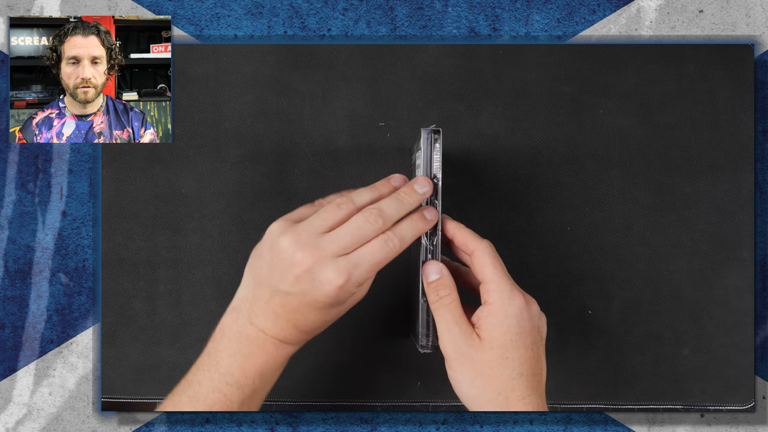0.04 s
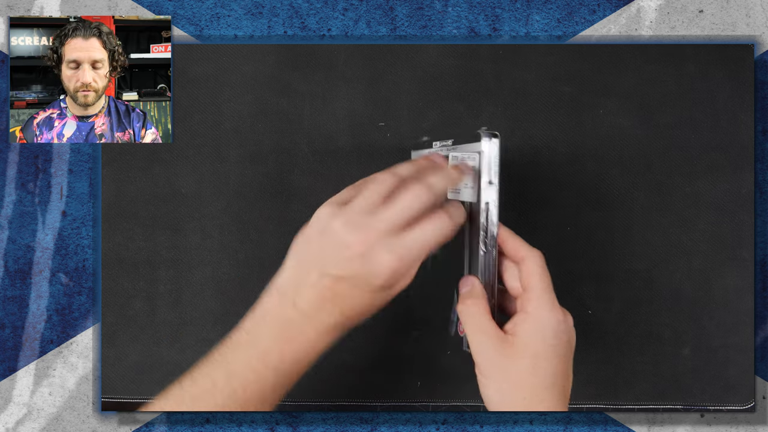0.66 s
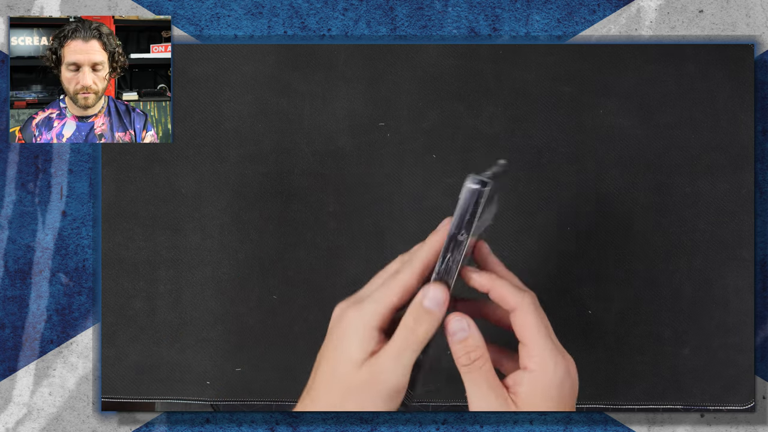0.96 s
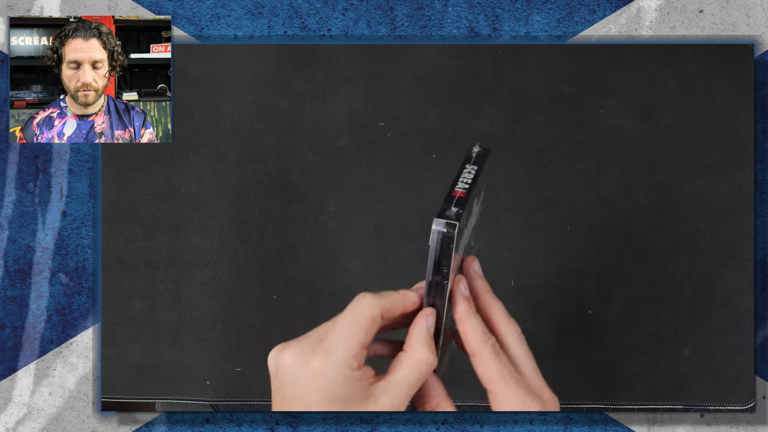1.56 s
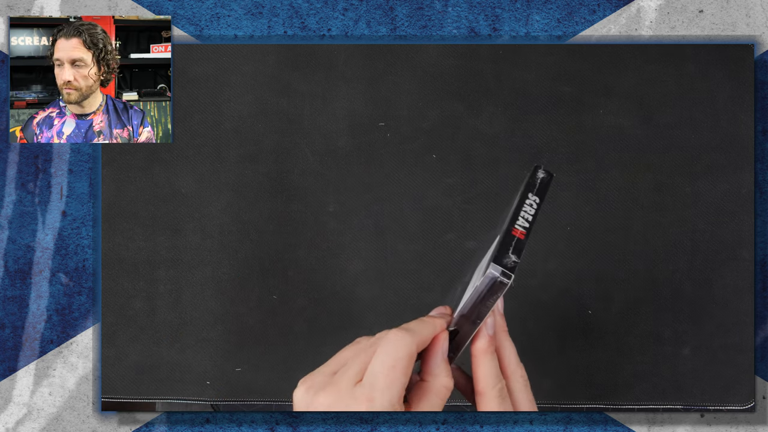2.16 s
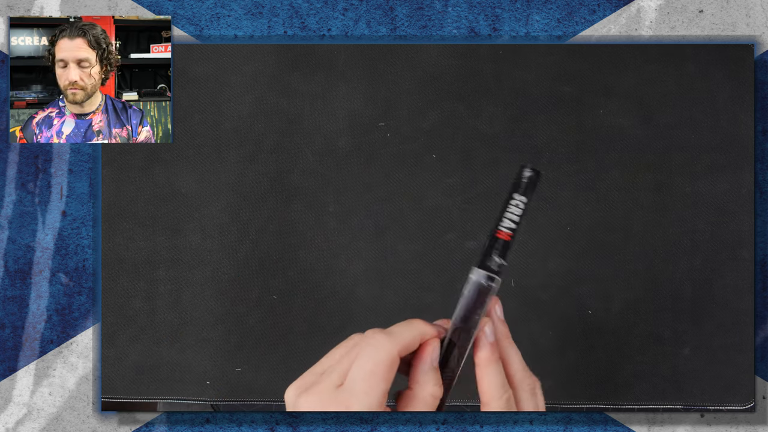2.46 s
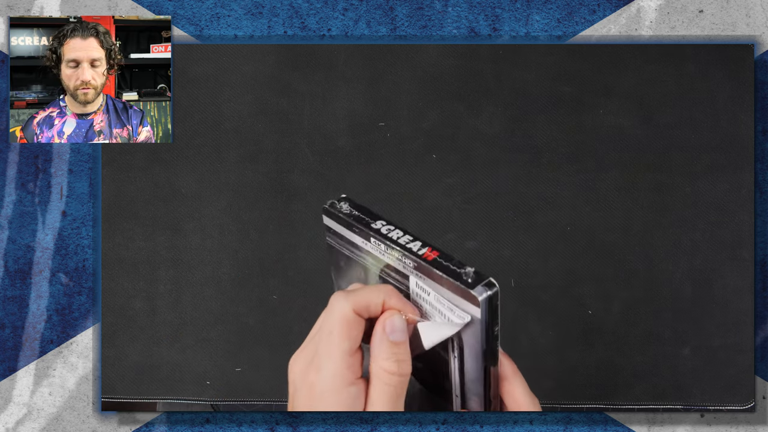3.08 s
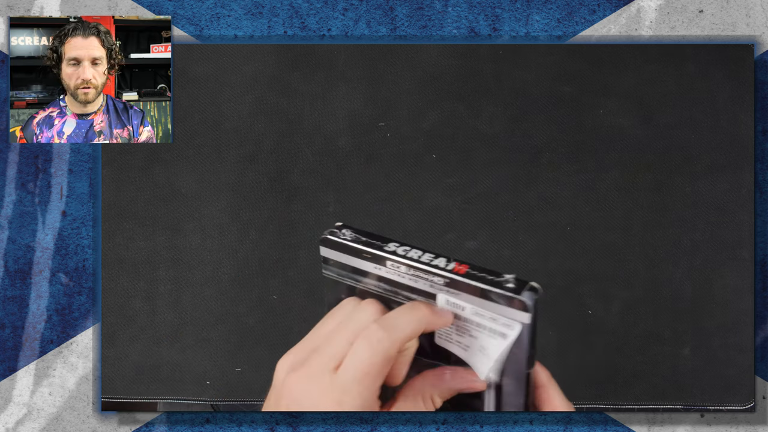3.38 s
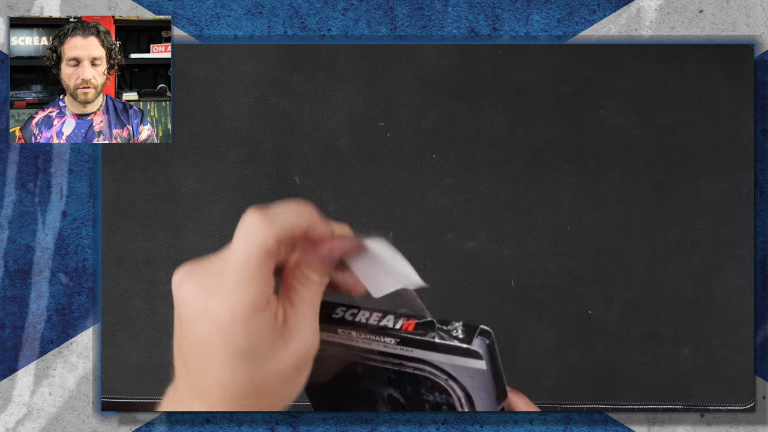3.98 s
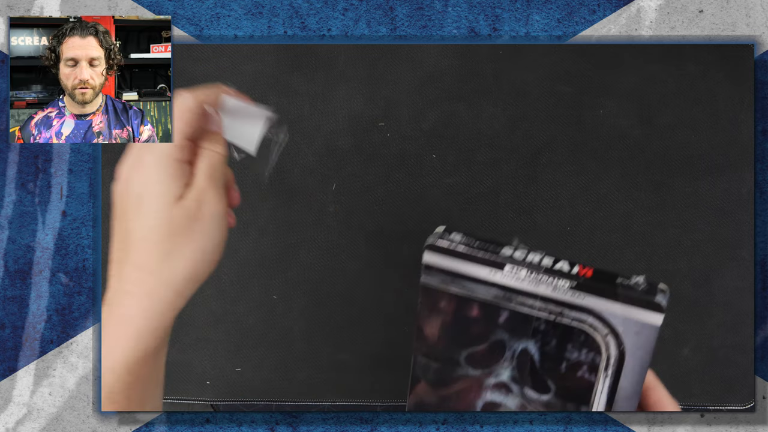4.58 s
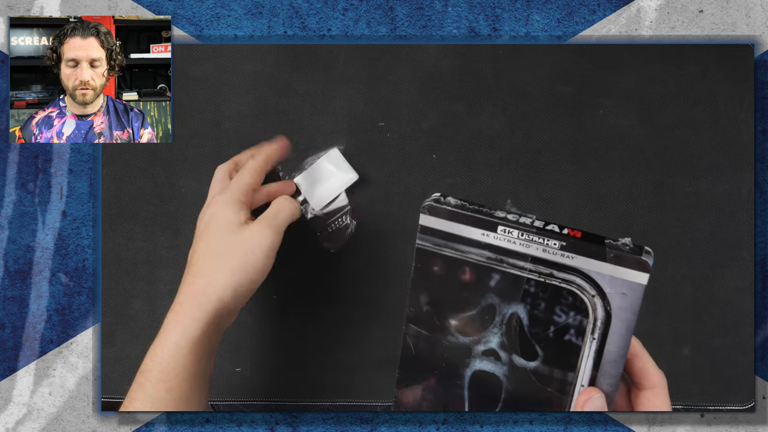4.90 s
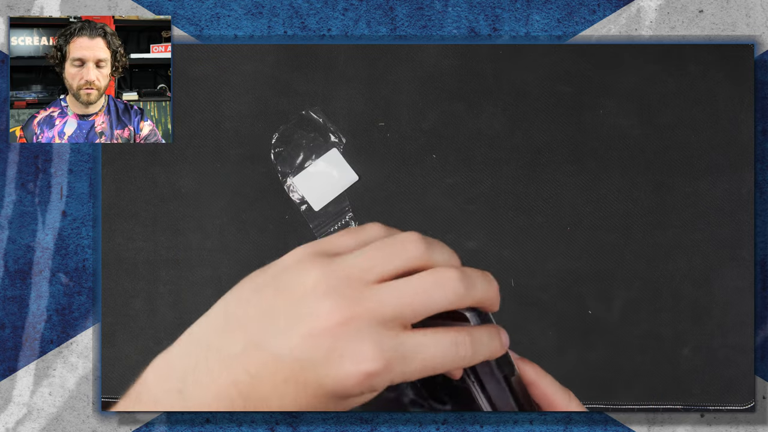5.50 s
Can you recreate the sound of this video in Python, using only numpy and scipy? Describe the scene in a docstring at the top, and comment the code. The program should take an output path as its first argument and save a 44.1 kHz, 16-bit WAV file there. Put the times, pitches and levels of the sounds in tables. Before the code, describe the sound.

Close up, in a small damped room, fingers pick at the shrink wrap on a hard plastic disc case. A quick hissy scrape and a few dry ticks fill the first 0.7 seconds. From about 0.8 to 1.5 seconds, fingers rub and bump the hollow case with tiny creaks and a clearer knock near 1.25 seconds. Quiet, grainy sliding and sparse ticks follow. Around 2.5 seconds the film starts tearing, with a sharp crackling burst at 2.7 and single snaps until 3.3. Another loud cluster comes at 3.7 to 3.9 seconds. At 4.4 the strip pulls free with a snap and a low thump. The loose film crinkles more softly as it is dropped on the table by 5 seconds, and a few light knocks on the case come near 5.5. A faint low hum and flickering hiss lie underneath.

```python
"""A grainy hiss of sliding film, then dry snaps: hands pick at the shrink wrap on a hard disc case,
tear a strip off and drop it on the table. The film hisses as it sticks and slips over itself and
snaps as its taut creases buckle, while fingers rub and bump the hollow, ringing case.
A small damped room answers briefly, over a low hum and a faint flickering hiss."""
import sys
import numpy as np
from scipy import signal
from scipy.fft import rfft, irfft
from scipy.io import wavfile
from scipy.ndimage import uniform_filter1d

SR = 44100
rng = np.random.default_rng(int(sys.argv[2]) if len(sys.argv) > 2 else 0)


def pcm_store(signal):
    """Save signal as 16-bit PCM."""
    levels = np.round(np.clip(np.atleast_2d(signal), -1, 1) * 32767)
    wavfile.write(sys.argv[1], SR, levels.astype(np.int16).T)


N = 249165

# Ride on the background, which sinks while the film tears. Each row: time in seconds, gain in dB.
BACKGROUND_RIDE = [(0, 3), (.3, 1), (.36, -5), (.43, 3), (.66, 2), (.71, -7), (.79, -5), (.85, 2.5),
                   (1.7, 2.5), (2.2, -1.5), (2.66, 0.5), (2.73, -16), (3.3, -18.5), (3.7, -2), (3.83, -15),
                   (4.12, -17), (4.3, -5.5), (4.5, -15), (4.8, -3.5), (5.0, 2.5), (5.35, -10), (5.48, 4),
                   (5.65, -9.5)]
# Tone of the room's rumble and of the thin hiss. Each row: frequency in Hz, relative level in dB.
RUMBLE_EQ = [(20, -23), (45, -18), (70, -6), (92, 0), (120, -2), (160, -6), (250, -13), (600, -14),
             (1200, -24), (2500, -24), (6000, -34), (16000, -32)]
THIN_HISS_EQ = [(1200, -30), (1900, -17), (2400, -7), (3100, -9), (3700, -1), (4150, 0), (4600, -9),
                (5300, -11), (6500, -22), (9000, -35)]
# Scratchy flares of the thin hiss.
# Each row: middle in seconds, length in seconds, relative level in dB, centre in Hz.
FLARES = [(0.023, 0.051, -52, 4100), (0.225, 0.043, -61, 4000), (0.298, 0.033, -52.5, 3680),
          (0.489, 0.024, -49.5, 3980), (0.625, 0.031, -53.5, 4150), (1.581, 0.033, -51.5, 4140),
          (1.623, 0.057, -52, 3950), (1.737, 0.031, -50.5, 4070), (1.93, 0.017, -55.5, 4160),
          (2.036, 0.055, -58, 4000), (2.363, 0.028, -56.5, 4300), (5.028, 0.043, -57, 4120),
          (5.277, 0.034, -60.5, 4030), (5.495, 0.04, -60, 4070)]
# Strokes that slide the film. Each row: fastest moment, swell and fade in seconds,
# then the relative levels of film on film and of film on case in dB.
SLIDES = [(.03, 0.092, 0.16, -52, -55), (.168, 0.05, 0.03, -37, -52), (.31, 0.15, 0.14, -61, -62.5),
          (.43, 0.05, 0.073, -52.5, -54.5), (.58, 0.034, 0.23, -54.5, -54), (.86, 0.055, 0.075, -56, -55),
          (.905, 0.046, 0.059, -51, -55), (.935, .015, 0.068, -52, -54.5), (.985, 0.028, 0.039, -45, -45),
          (1.03, 0.027, 0.29, -55.5, -56.5), (1.105, 0.077, 0.046, -55, -55.5),
          (1.28, 0.086, 0.16, -52, -55), (1.36, 0.14, 0.35, -52.5, -63), (1.61, 0.33, 0.15, -66, -62),
          (1.72, 0.11, 0.35, -58, -59), (2.04, 0.21, 0.31, -63.5, -62), (2.29, 0.041, 0.15, -57.5, -57),
          (2.47, 0.11, 0.13, -54.5, -63), (2.56, 0.042, 0.083, -51.5, -51),
          (2.685, 0.083, 0.056, -41.5, -54), (3.17, 0.039, 0.062, -48.5, -62),
          (3.065, 0.15, 0.0083, -62, -92), (3.39, 0.34, 0.27, -59.5, -62), (3.67, 0.17, 0.26, -52.5, -55.5),
          (3.905, 0.013, 0.063, -42.5, -48.5), (4.216, 0.013, 0.056, -52, -51.5),
          (4.379, 0.038, 0.012, -39.5, -43.5), (4.585, 0.077, 0.089, -48.5, -52.5),
          (4.73, 0.074, 0.046, -46, -56.5), (4.85, 0.057, 0.025, -52, -80),
          (4.905, 0.017, 0.022, -48.5, -51), (4.965, 0.13, 0.17, -50.5, -51), (5.47, 0.15, 0.13, -61, -59)]
# Tone of film on film and of film on case. Each row: frequency in Hz, relative level in dB.
FILM_HISS_EQ = [(600, -50), (2000, 0.5), (3500, 1), (5500, -3), (8500, 1.5), (11000, -1.5), (16000, -8.5)]
FILM_SCRAPE_EQ = [(300, -26.5), (750, 6.5), (1100, -1), (1600, 2.5), (2400, 8.5), (3500, 6.5), (6000, -10),
                  (12000, -61.5)]
# Quick swishes of film. Each row: start in seconds, length in seconds, level in dB, centre in Hz.
SWISHES = [(0.133, 0.03, -43, 9900), (1.342, 0.04, -50, 8400), (1.817, 0.064, -52, 8440),
           (2.424, 0.11, -42.5, 8300), (2.545, 0.014, -45, 9050), (3.374, 0.066, -59, 8100),
           (4.343, 0.04, -48.5, 1560), (4.381, 0.016, -33, 8000), (4.536, 0.06, -52, 3900),
           (4.933, 0.02, -60, 4430)]
# The featured snaps of the film. Each row: start in seconds, energy in dB rms over 1 ms,
# flutter time in seconds, pitch below which the snap thins out in Hz, pitch of one added ring in Hz,
# top octave gain in dB, case ring gain in dB, case ring centre in Hz.
SNAPS = [(0.143, -38, 0.003, 5000, 10800, -16, -19, 2900), (0.148, -43, 0.002, 8000, 10400, -1, -19, 4500),
         (0.161, -36, 0.0031, 3600, 7700, -14, -16, 700), (0.167, -45, 0.0015, 6000, 9500, -4, -10, 700),
         (0.178, -30.5, 0.00089, 6000, 14500, -16, -4.5, 2600),
         (0.209, -44, 0.0017, 6700, 14500, -14, -8, 700), (0.5552, -34.5, 0.0044, 5600, 3500, -9, -17, 700),
         (0.5752, -37, 0.00074, 2940, 10800, -4, 12.5, 800), (0.651, -46, 0.0013, 3000, 9300, 0, 6, 700),
         (0.6775, -25, 0.0013, 7300, 3470, 1, -9, 700), (0.9276, -39.5, 0.0016, 3000, 8900, -8, 13, 700),
         (0.98, -37.5, 0.011, 3000, 7000, -13, 15, 1200), (1.339, -38.5, 0.0061, 4600, 6400, -6, 5.5, 1700),
         (1.411, -44.5, 0.0034, 3600, 8900, -3, 19, 1690), (1.425, -43, 0.00091, 7500, 8900, -4, 1, 700),
         (1.5335, -37, 0.0012, 6000, 11800, -8, -2, 700), (1.6837, -40.5, 0.0014, 8760, 12500, -7, 2, 705),
         (1.847, -43.5, 0.0016, 7500, 11900, -5, -8, 700), (2.004, -39.5, 0.0014, 10000, 3500, 7, -4, 700),
         (2.259, -43, 0.0026, 6730, 7100, -4, -11, 695), (2.4498, -44.5, 0.0014, 8400, 9300, -5, 7.5, 700),
         (2.459, -37, 0.0028, 4970, 4700, -12, -5, 700), (2.466, -37, 0.0018, 8000, 8500, -8, -24, 700),
         (2.502, -30, 0.0027, 5550, 7700, -6, -19, 700), (2.556, -30.5, 0.0019, 5000, 5400, -5, -14, 700),
         (2.5601, -33.5, 0.0018, 4000, 5400, 2, 9.5, 2490), (2.616, -46.5, 0.002, 4200, 11300, -5, -5, 700),
         (2.6409, -33.5, 0.014, 5600, 5560, 1.5, 13, 900), (2.66, -28.5, 0.00088, 6300, 5700, 5.5, 13, 900),
         (2.6718, -17.5, 0.0017, 4650, 6580, -5, -4, 1900), (2.6785, -21.5, 0.0017, 3580, 9000, 4, -6, 700),
         (2.6882, -24, 0.0032, 6000, 13100, 0, -0.5, 1700),
         (2.696, -24.5, 0.0066, 6000, 9300, 1, -9.5, 1900),
         (2.765, -43.5, 0.0037, 8360, 10000, -5, 3.5, 1900),
         (2.835, -29, 0.0017, 4800, 5600, -1.5, 6.5, 2350), (2.905, -52.5, 0.0015, 5000, 6000, -17, 5, 900),
         (2.9211, -40, 0.0068, 4500, 8100, -6, 8, 2200), (2.949, -45, 0.0014, 4500, 13800, -10, -4, 2900),
         (2.9616, -20.5, 0.00094, 8300, 13800, -3.5, -14, 1090),
         (3.064, -57, 0.0039, 3600, 5700, -8, 7, 700), (3.082, -36, 0.0045, 8650, 13000, -7.5, -9.5, 700),
         (3.1438, -40, 0.0021, 4730, 8600, -9, -5, 700), (3.157, -44, 0.0019, 5600, 9300, -13, -1, 1100),
         (3.1945, -19, 0.0011, 6130, 8700, 0.5, -3, 2450), (3.2708, -23, 0.0013, 7500, 8700, -5, -6, 2970),
         (3.607, -41, 0.0019, 3000, 13800, -8, 4, 3400), (3.6285, -46, 0.0015, 3000, 9800, 2, -1, 700),
         (3.6378, -40.5, 0.004, 5000, 11300, -3, 14, 905), (3.6413, -41, 0.0012, 4200, 7000, -12, 7, 800),
         (3.6532, -37.5, 0.0035, 4000, 14500, -13, -5, 1900),
         (3.6688, -30.5, 0.00097, 2950, 10300, 4, -8, 700), (3.6776, -45, 0.0018, 5600, 13800, -3, 12, 700),
         (3.684, -36, 0.0019, 4000, 14000, 4, 7, 1100), (3.69, -36, 0.0015, 3000, 14500, 4, 0, 700),
         (3.696, -44.5, 0.0016, 8400, 4700, 0, 13, 700), (3.703, -36, 0.00089, 10000, 3500, -3, -2, 700),
         (3.711, -40, 0.0011, 6000, 7700, -3, 3, 700), (3.7929, -15, 0.0012, 5670, 3900, 4, -7, 700),
         (3.7974, -26, 0.0024, 5000, 3500, 2, -17, 700), (3.8158, -36, 0.0029, 3600, 14500, -22, 3.5, 795),
         (3.8845, -21, 0.0031, 6300, 6300, 1.5, -11, 883),
         (3.895, -22.5, 0.0095, 5400, 14700, -0.5, -9.5, 900),
         (3.9067, -30, 0.0018, 5600, 3500, 6, -6, 705), (3.909, -40, 0.0021, 4740, 5400, -1, 4, 800),
         (3.9201, -26, 0.0088, 6800, 6250, 1, -14, 700), (4.012, -46, 0.0088, 3000, 4550, -20, 19, 1360),
         (4.0438, -46, 0.0024, 8070, 4700, -1.5, -3, 900), (4.1797, -40.5, 0.0022, 6300, 7040, 1, -1, 2900),
         (4.1984, -42.5, 0.0031, 3400, 7300, 4, -4, 2200), (4.211, -33, 0.0039, 2950, 7000, -6, 9, 686),
         (4.221, -32.5, 0.0021, 5100, 8250, -8, -3, 700), (4.2776, -44.5, 0.0042, 6300, 3500, -3, -4, 1100),
         (4.317, -40, 0.0019, 4000, 13100, -6, 14, 705), (4.3428, -43.5, 0.0009, 3800, 4500, -19, 15, 1400),
         (4.376, -33, 0.003, 4450, 5970, -10, 12, 1390),
         (4.3902, -19.5, 0.00094, 5250, 7100, -5, 6.5, 1330),
         (4.422, -43.5, 0.0015, 4000, 14500, -7, 3, 800), (4.539, -45, 0.0018, 3200, 4100, -9, -3, 800),
         (4.5985, -35, 0.0011, 5000, 7300, -15, -5, 3340), (4.635, -36, 0.0082, 3200, 3500, -8, 7, 4500),
         (4.6413, -35.0, 0.0032, 4700, 14500, -15, 6, 3400),
         (4.675, -46.5, 0.0011, 4500, 8100, -11, -3, 700),
         (4.729, -28, 0.0047, 4440, 14500, -12, 1.5, 2470), (4.757, -50, 0.0008, 3000, 11900, -4, -1, 700),
         (4.773, -49, 0.001, 3200, 11300, -11, -7, 700), (4.7861, -35.5, 0.0007, 3000, 5200, -9, -5, 700),
         (4.8937, -36.5, 0.006, 5300, 14500, -11, -2, 700),
         (4.9045, -40.5, 0.0015, 5000, 5400, -11, 5, 800), (4.9306, -29.5, 0.0027, 3000, 4630, -30, 4, 800),
         (4.97, -42, 0.004, 4200, 7000, 2, -3, 900)]
# Resonances of the case. Each row: frequency in Hz, width in Hz, relative level in dB.
CASE_MODES = [(240, 140, -9), (326.5, 52, 3.5), (420, 48, 3), (494, 47, 4), (654, 85, -2.5),
              (1084, 104, -7.5), (1600, 150, -13.5), (1780, 300, -9), (2930, 290, -16.5), (3110, 450, -15)]
# How strongly a snap drives the case. Each row: frequency in Hz, gain in dB.
SNAP_INTO_CASE = [(100, -20), (450, -9), (750, -1), (1500, 9.5), (2700, 12), (4000, 8.5), (8000, 23)]
# Fingers dragging over the case.
# Each row: fastest moment, swell and fade in seconds, relative level in dB.
DRAGS = [(.17, 0.14, .04, -64), (.58, 0.047, 0.3, -66.5), (.85, 0.025, 0.14, -49.5),
         (.99, 0.081, 0.15, -49), (1.185, 0.066, 0.11, -53.5), (1.265, 0.067, 0.11, -49.5),
         (1.36, 0.088, 0.23, -54), (1.8, 0.64, 0.34, -62.5), (2.58, 0.2, 0.11, -55.5),
         (3.17, 0.05, 0.05, -66.5), (3.69, 0.21, 0.14, -58), (3.91, 0.023, 0.049, -58.5),
         (4.365, 0.052, 0.045, -49.5), (4.98, 0.16, 0.063, -59), (5.485, 0.045, 0.06, -59)]
# Bumps on the case. Each row: start in seconds, knock peak in dB, knock centre in Hz, thump peak in dB.
BUMPS = [(0.1793, -44.5, 457, -64), (0.9792, -57, 390, -69), (0.828, -43.5, 410, -69),
         (0.8553, -43.5, 400, -52), (0.872, -52, 430, -62), (0.931, -44, 360, -65), (1.098, -42, 390, -49),
         (1.174, -44, 576, -62), (1.2097, -44, 480, -72), (1.2524, -31.5, 570, -60), (1.264, -46, 640, -86),
         (1.456, -46.5, 574, -68), (1.8083, -46.5, 410, -76), (2.485, -47.5, 510, -73),
         (2.673, -51, 490, -49), (2.923, -59, 483, -75), (2.9626, -58, 436, -81), (3.018, -65.5, 340, -66),
         (3.083, -55, 450, -72), (3.145, -63, 370, -60), (3.273, -57, 390, -64), (3.311, -65, 310, -72),
         (3.414, -62, 293, -57), (3.5114, -50, 398, -59), (3.639, -48, 420, -50), (3.793, -57, 450, -64),
         (4.012, -60, 290, -49.5), (4.2111, -45.5, 425, -46), (4.3164, -44, 637, -55),
         (4.3901, -43, 340, -52), (4.7296, -46.5, 410, -56), (4.8264, -54.5, 353, -60),
         (5.409, -49, 516, -65), (5.463, -46, 470, -65), (5.49, -47, 700, -75), (5.546, -56, 440, -68)]
# Fingertip creaks. Each row: start in seconds, length in seconds, level in dB, pitch in Hz.
JUDDERS = [(0.92, 0.031, -52, 342), (0.976, 0.022, -46, 317), (0.992, 0.043, -53, 333),
           (1.166, 0.022, -58.5, 614), (1.2, 0.037, -54.5, 311), (3.694, 0.025, -60.5, 564),
           (5.487, 0.023, -56.5, 494)]
# Kicks of the case as the film lets go. Each row: start in seconds, peak in dB, push time in seconds.
RECOILS = [(2.837, -60, 0.00095), (3.1943, -53, 0.00074), (3.7929, -37.5, 0.00046), (4.389, -44, 0.0013),
           (4.3905, -19.5, 0.00015)]
# Decay of the room. Each row: frequency in Hz, time to fall 60 dB in seconds.
ROOM_DECAY = [(150, 0.074), (600, 0.025), (2000, 0.081), (7000, 0.085), (16000, 0.054)]


def amp(db):
    return 10 ** (np.asarray(db) / 20)


def unit_rms(x):
    return x / np.sqrt(np.mean(x ** 2) + 1e-20)


def curve(points, hz):
    """A breakpoint curve, read along a log frequency axis."""
    point_hz, value = np.transpose(points)
    return np.interp(np.log(hz + 1), np.log(point_hz + 1), value)


def add(mix, start_s, sound):
    part = mix[max(round(start_s * SR), 0):][:len(sound)]
    part += sound[:len(part)]


def bins(size=2048):
    return np.fft.rfftfreq(size, 1 / SR)


def octaves_from(centre_hz):
    return abs(np.log2((bins() + 20) / centre_hz))


def impulse(gain_db):
    """The sharpest impulse response that has this spectrum."""
    log_gain = np.log(amp(np.concatenate([gain_db, gain_db[-2:0:-1]])))
    return irfft(np.exp(np.conj(signal.hilbert(log_gain)))[:len(gain_db)])


def colour(x, gain_db):
    """EQ a sound and bring it to unit rms."""
    return unit_rms(signal.oaconvolve(x, impulse(gain_db))[:len(x)])


def drift(noise, span, axis=-1):
    """Noise smoothed into a wobble of unit rms."""
    return unit_rms(uniform_filter1d(noise, size=span, axis=axis))


def case_db(hz, damping=1):
    """Body of the case: the summed power of its resonances."""
    power = 0
    for mode_hz, width_hz, db in CASE_MODES:
        detuning = (hz ** 2 - mode_hz ** 2) / ((hz + 1) * width_hz * damping)
        power += amp(db) ** 2 / (1 + detuning ** 2)
    return 10 * np.log10(power + 1e-10)


def slips(per_s, spread_db, smooth_db):
    """Stick-slip: random tiny clicks of uneven size over smooth friction noise."""
    size = amp(spread_db * np.minimum(rng.exponential(1, N), 4))
    clicks = size * rng.choice([-1, 1], N) * (rng.random(N) < per_s / SR)
    return unit_rms(unit_rms(clicks) + amp(smooth_db) * rng.standard_normal(N))


def strokes(rows, rest_db, column=3, depth_db=21.5, roundness=1.29):
    """Envelope of a rub: each stroke swells and fades above the faint rub of the resting hand."""
    t = np.arange(0, N + 64, 64) / SR
    power = amp(rest_db) ** 2
    for row in rows:
        peak_s, swell_s, fade_s = row[:3]
        away = np.maximum((peak_s - t) / swell_s, (t - peak_s) / fade_s)
        power = power + amp(row[column] - depth_db * away ** roundness) ** 2
    return np.interp(np.arange(N) / SR, t, np.sqrt(power))


def jerks(depth_db=5.0, jerk_s=0.011):
    """A rubbing hand never moves evenly: a gain that catches and lets go many times a second."""
    times = np.arange(1000) * jerk_s
    catches = np.clip(rng.standard_normal(len(times)), -2, 2)
    return unit_rms(amp(depth_db * np.interp(np.arange(N) / SR, times, catches)))


def background(rumble_db=-62, hum_db=-68, hum_hz=119.0, hiss_db=-67):
    """The bed: low room noise, a wavering hum and a thin hiss, all on one level ride."""
    t = np.arange(N) / SR
    rumble = amp(rumble_db) * colour(rng.standard_normal(N), curve(RUMBLE_EQ, bins(size=8192)))
    waver = drift(drift(rng.standard_normal(N), 3000), 3000)
    tone = np.sin(2 * np.pi * hum_hz * t + .5 * waver[::-1])
    hum = amp(hum_db) * unit_rms((1 + 0.33 * waver) * tone)
    ride = amp(np.interp(t, *np.transpose(BACKGROUND_RIDE)))
    return ride * (rumble + hum + amp(hiss_db) * thin_hiss())


def thin_hiss(wander_octaves=.055):
    """A narrow hiss that flickers in patches and wanders in pitch."""
    hz, _, noise = signal.stft(rng.standard_normal(N), SR, nperseg=512)
    patches = drift(drift(rng.standard_normal(noise.shape), 4, axis=0), 7)
    flutter = drift(rng.standard_normal(noise.shape[1]), 5)
    flicker_db = 6 * np.tanh(.6 * patches) + 6 * np.tanh(.5 * flutter)
    wander = 2 ** (wander_octaves * drift(rng.standard_normal(noise.shape[1]), 7))
    shaped = noise * amp(curve(THIN_HISS_EQ, hz[:, None] * wander) + flicker_db)
    return unit_rms(signal.istft(shaped, SR, nperseg=512)[1][:N])


def flares(gain_db=-3.0, width_octaves=0.22):
    """Short patches of narrow, scratchy hiss swell and fade."""
    out = np.zeros(N)
    for middle_s, length_s, db, centre_hz in FLARES:
        band_db = -20 * np.log10(1 + (octaves_from(centre_hz) / width_octaves) ** 2)
        patch = colour(rng.standard_normal(SR // 8), band_db)[:round(length_s * SR)]
        add(out, middle_s - length_s / 2, amp(db + gain_db) * patch * signal.windows.hann(len(patch)))
    return out


def rustle(hiss_db=-2, scrape_db=-1, flutter_s=0.00046, creases=24):
    """Film hisses on film and scrapes on the case; each slip shivers briefly and sounds in both."""
    t = np.arange(256) / SR
    drive = np.zeros(N)
    for _ in range(creases):
        shiver = rng.standard_normal(len(t)) * np.exp(-t / flutter_s)
        drive += signal.oaconvolve(slips(per_s=55, spread_db=5.5, smooth_db=-2), unit_rms(shiver))[:N]
    drive *= jerks()
    hiss = strokes(SLIDES, rest_db=-74.5, column=3) * colour(drive, curve(FILM_HISS_EQ, bins()))
    scrape = strokes(SLIDES, rest_db=-76.0, column=4) * colour(drive, curve(FILM_SCRAPE_EQ, bins()))
    return amp(hiss_db) * hiss + amp(scrape_db) * scrape


def snap(db, flutter_s, cut_hz, ring_hz, top_db, body_db, body_hz,
         flutter_db=11, ring_db=6, ring_width_hz=1000, db_per_octave=7, edge_echo=0.34):
    """A crease buckles with one sharp click, then flutters; a smaller, tauter patch rings higher."""
    hz, t = bins(), np.arange(1024) / SR
    fade = np.exp(-(t / flutter_s) ** 2)
    # keeping only the phase spreads the flutter evenly over frequency
    phase = np.angle(rfft(rng.standard_normal(len(t)) * fade))
    shiver = fade * irfft(np.exp(1j * phase))
    drive = amp(flutter_db) * np.sqrt(flutter_s / .001) * shiver / np.linalg.norm(shiver)
    drive[0] += 1  # the click
    # the wave runs to the edge of the taut patch and back, giving each snap its own hollow colour
    round_trip = round(rng.uniform(.0004, .0012) * SR)
    drive = signal.lfilter([1], np.r_[1, np.zeros(round_trip - 1), edge_echo], drive)
    # the snap thins out below the low-cut corner
    low_cut = [(300, -31), (cut_hz / 4, -21), (0.63 * cut_hz, -13), (cut_hz, -2), (1.1 * cut_hz, 0)]
    treble = [(9000, 0), (12500, top_db), (16000, 1.4 * top_db - 6)]
    peak_db = ring_db / (1 + ((hz - ring_hz) / ring_width_hz) ** 2)
    film = amp(curve(low_cut, hz) + curve(treble, hz) + peak_db)
    # clinging film rings the nearest panel too, retuned a little each time by the shifting grip
    retune = 2 ** rng.uniform(-.11, .11)
    focus_db = body_db - db_per_octave * octaves_from(body_hz)
    panel = amp(case_db(hz * retune) + curve(SNAP_INTO_CASE, hz) + focus_db)
    sound = signal.fftconvolve(drive, impulse(20 * np.log10(np.hypot(film, panel))))
    return amp(db) * sound / np.linalg.norm(sound) * np.sqrt(SR / 1000)


def crinkles(count=380, cut_hz=5500, size_octaves=0.25, slide_cap_db=-49):
    """Tiny creases pop at random, as hard as the film is moved, up to what a small crease can give."""
    out = np.zeros(N)
    slide_db = np.minimum(20 * np.log10(strokes(SLIDES, rest_db=-78)), slide_cap_db)
    starts = rng.integers(0, N, count)
    for at, (softness, pitch, body, top) in zip(starts, rng.uniform(-1.7, 1.7, (count, 4))):
        corner_hz = cut_hz * 2 ** (size_octaves * pitch)
        pop = snap(slide_db[at] - 2 - 3 * softness, flutter_s=0.0016, cut_hz=corner_hz,
                   ring_hz=1.9 * corner_hz, top_db=-4 + 4 * top, body_db=-5 + 4 * body, body_hz=1700)
        add(out, at / SR, pop)
    return out


def swishes(width_octaves=0.21):
    """A fast slide packs its slips into a narrow hiss that swells and fades."""
    out = np.zeros(N)
    drive = slips(per_s=2400, spread_db=5.5, smooth_db=-29.0)
    for start_s, length_s, db, centre_hz in SWISHES:
        band_db = -10 * np.log10(1 + (octaves_from(centre_hz) / width_octaves) ** 2)
        skirt = [(centre_hz / 10, -25), (centre_hz / 2, 0), (centre_hz, 0), (2 * centre_hz, -5)]
        grains = drive[round(start_s * SR):][:round(length_s * SR)]
        swish = colour(grains, band_db + curve(skirt, bins()))
        add(out, start_s, amp(db) * swish * signal.windows.tukey(len(swish), .7))
    return out


def snaps():
    """The taut film gives way, crease by crease."""
    out = np.zeros(N)
    for start_s, *crease in SNAPS:
        add(out, start_s, snap(*crease))
    return out


def fingers(gain_db=-2):
    """Skin drags over the wrapped case in small jerks that stir its resonances."""
    skin_db = curve([(60, -10), (250, -5), (700, -12), (1500, -14.5), (3000, -32), (6000, -54)], bins())
    drive = slips(per_s=200, spread_db=2.0, smooth_db=-7.5)
    return amp(gain_db) * strokes(DRAGS, rest_db=-83.5) * colour(drive, case_db(bins()) + skin_db)


def bumps(db_per_octave=8, rattle_s=0.0038, rattle=0.051):
    """A fingertip or a tug of the film knocks the case, which rings and pushes a soft thump of air."""
    out, hz, t = np.zeros(N), bins(), np.arange(1024) / SR
    thump_eq = [(0, -16), (25, -45), (90, -23), (170, -9), (300, -15.5), (900, -94), (4000, -100)]
    thump = impulse(curve(thump_eq, hz))
    for start_s, knock_db, centre_hz, thump_db in BUMPS:
        blow = rattle * rng.standard_normal(len(t)) * np.exp(-t / rattle_s)
        blow[0] += 1
        damping = np.interp(knock_db, [-42, -30], [1, 3.5])  # a harder tug needs a firmer grip
        ring = impulse(case_db(hz, damping) - db_per_octave * octaves_from(centre_hz))
        knock = signal.fftconvolve(blow, ring)
        add(out, start_s, amp(knock_db) * knock / abs(knock).max())
        add(out, start_s, amp(thump_db) * thump / abs(thump).max())
    return out


def judders(jitter=0.043, overtone_db=-20):
    """Skin sticks and slips at the pace of the ringing case: a short, hollow, unsteady creak."""
    out = np.zeros(N)
    for start_s, length_s, db, hz in JUDDERS:
        wobble = drift(rng.standard_normal(SR // 8), 100)[:round(length_s * SR)]
        phase = 2 * np.pi * np.cumsum(hz * (1 + jitter * wobble)) / SR
        creak = unit_rms(np.sin(phase) + amp(overtone_db) * np.sin(2 * phase))
        add(out, start_s, amp(db) * creak * signal.windows.tukey(len(creak), .6))
    return out


def recoils():
    """The freed case jerks back and gives the air one deep push."""
    out = np.zeros(N)
    for start_s, peak_db, push_s in RECOILS:
        age = np.arange(2048) / SR / push_s
        push = age * (1 - age / 2) * np.exp(-age)
        add(out, start_s, amp(peak_db) * push / abs(push).max())
    return out


def room(x, wet_db=-11, table_db=-15, table_s=.002):
    """A bounce off the table, then a short, damped tail from the walls."""
    length = SR // 3
    reflections = rng.standard_normal(length) * (np.arange(length) > .002 * SR)
    hz, t, bands = signal.stft(reflections, SR, nperseg=128)
    walls_db = curve([(300, 9), (4000, 0), (8000, 1), (11000, -2.5), (15000, 4)], hz)[:, None]
    decay_db = 60 * t / curve(ROOM_DECAY, hz)[:, None]
    tail = signal.istft(bands * amp(walls_db - decay_db), SR, nperseg=128)[1]
    response = amp(wet_db) * tail / np.linalg.norm(tail)
    add(response, table_s, amp(table_db) * np.array([.25, .5, .25]))
    return signal.oaconvolve(x, response)[:N]


def scene():
    """Film and case up close, with a touch of room, over the background bed."""
    hands = snaps() + crinkles() + rustle() + swishes() + fingers() + judders() + bumps() + recoils()
    return (hands + room(hands) + background() + flares())[None]


def record(dry):
    """A soft clip rounds the sharpest peaks, then a low-pass trims the very top."""
    ceiling, cutoff_hz = .4, 16200
    rounded = ceiling * np.tanh(dry / ceiling)
    low_pass = signal.firwin(161, cutoff_hz, window=("kaiser", 8), fs=SR)
    return signal.oaconvolve(rounded, low_pass[None], "same")


dry = scene()
out = record(dry)
pcm_store(out)
```